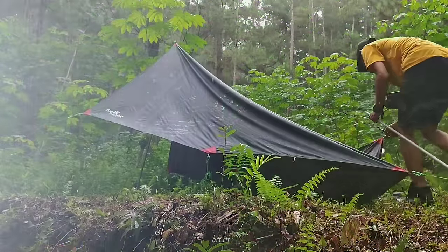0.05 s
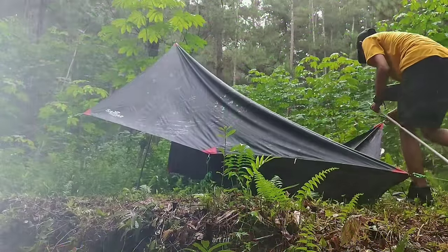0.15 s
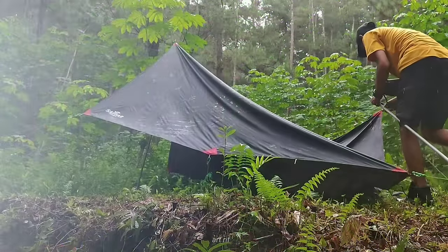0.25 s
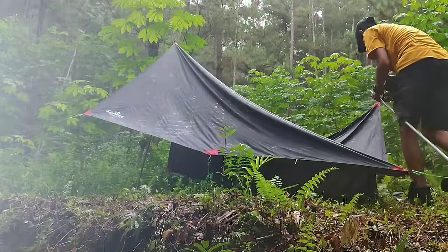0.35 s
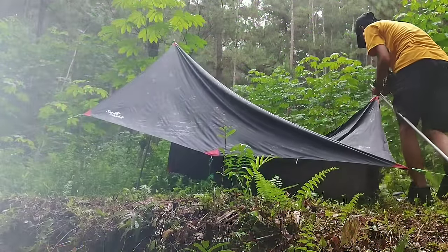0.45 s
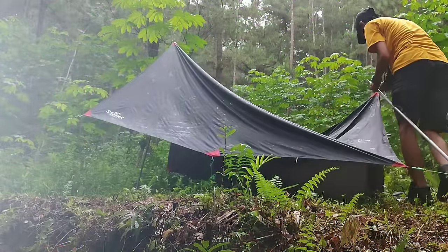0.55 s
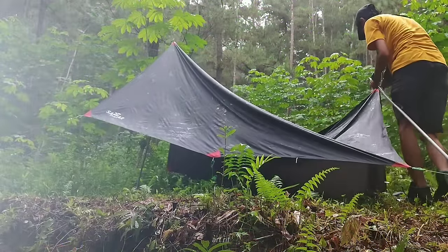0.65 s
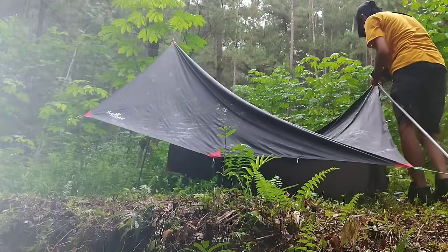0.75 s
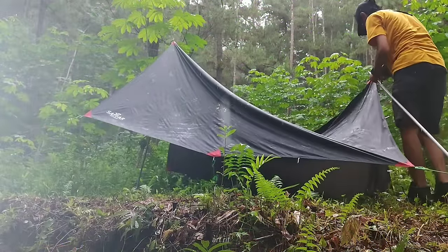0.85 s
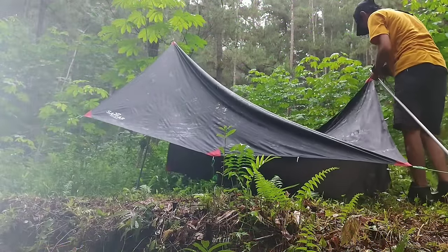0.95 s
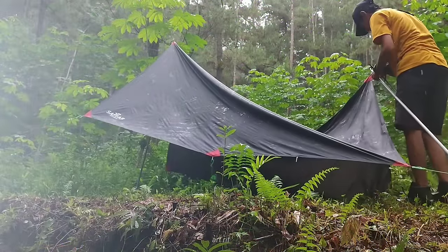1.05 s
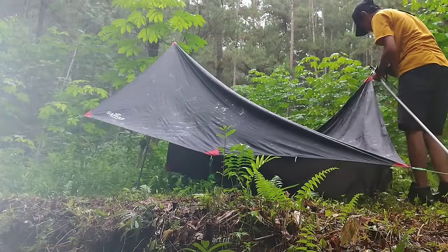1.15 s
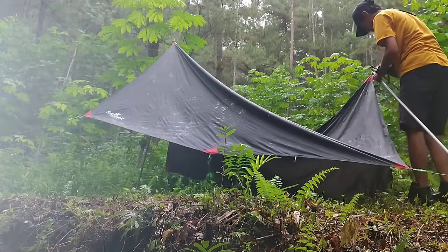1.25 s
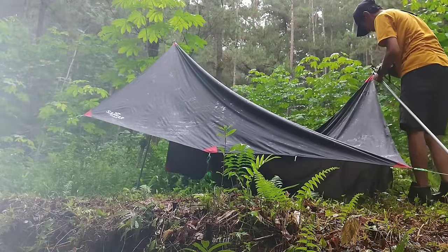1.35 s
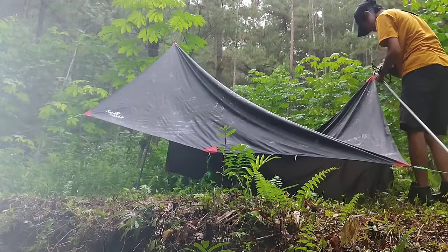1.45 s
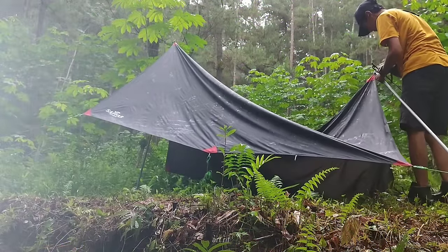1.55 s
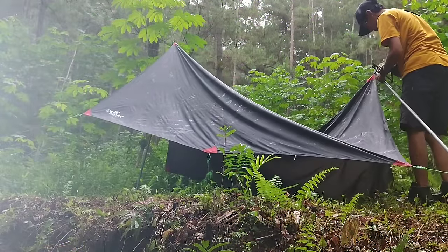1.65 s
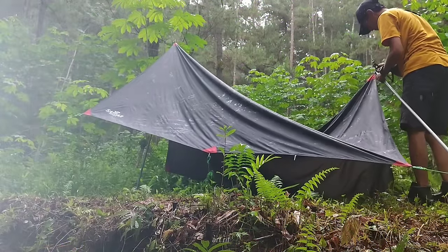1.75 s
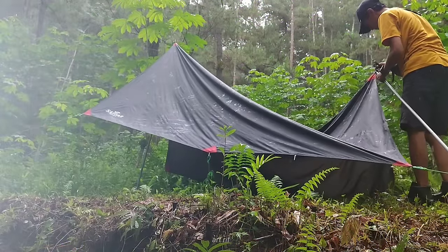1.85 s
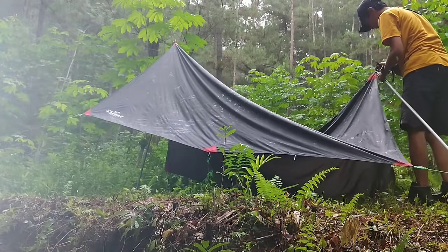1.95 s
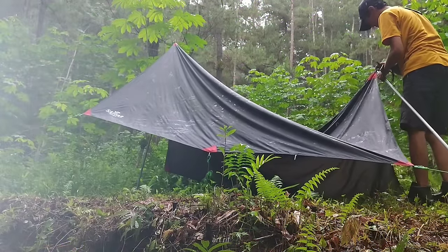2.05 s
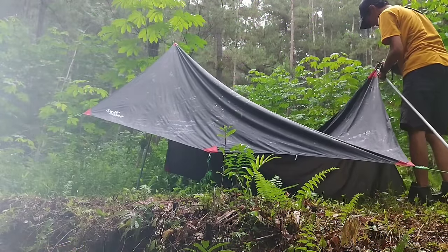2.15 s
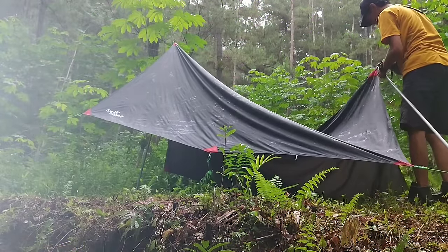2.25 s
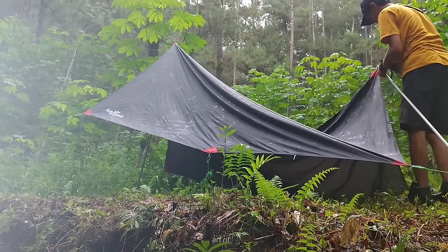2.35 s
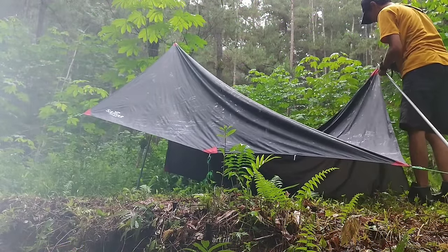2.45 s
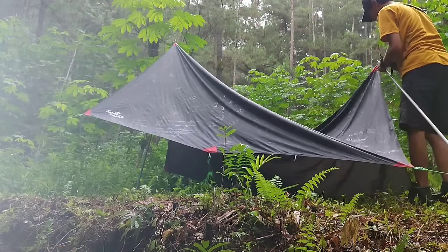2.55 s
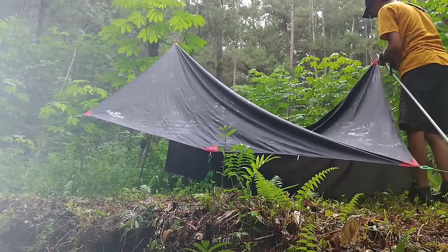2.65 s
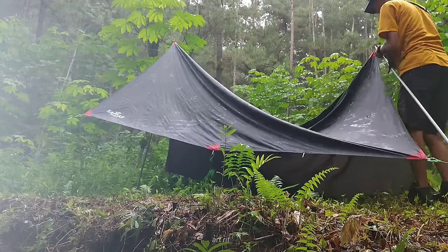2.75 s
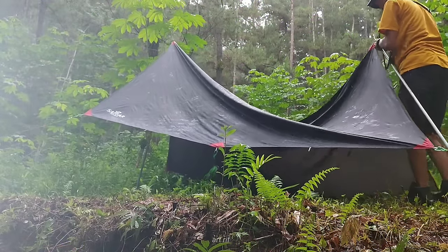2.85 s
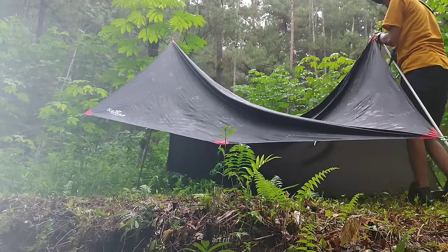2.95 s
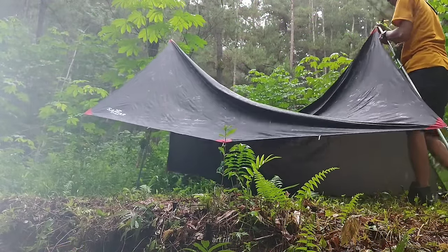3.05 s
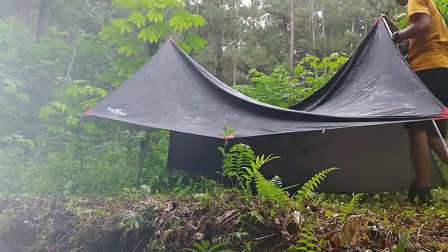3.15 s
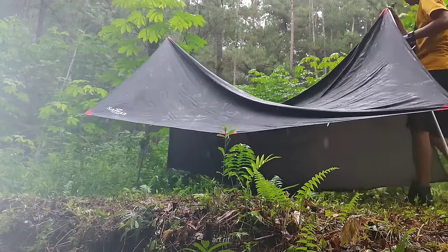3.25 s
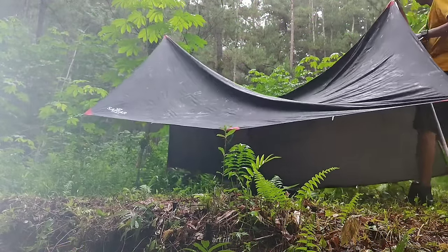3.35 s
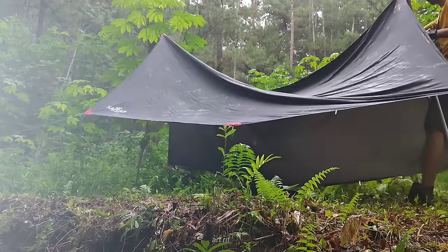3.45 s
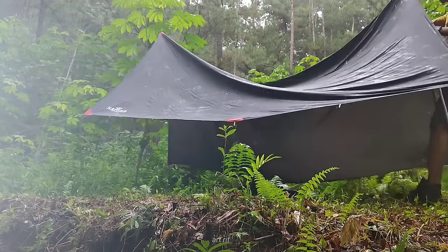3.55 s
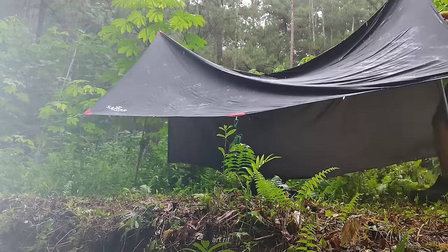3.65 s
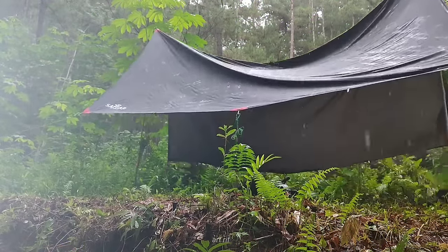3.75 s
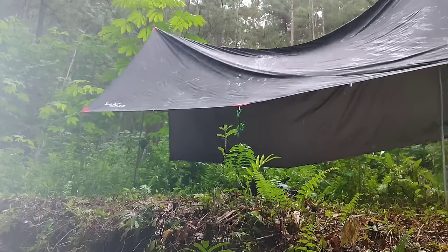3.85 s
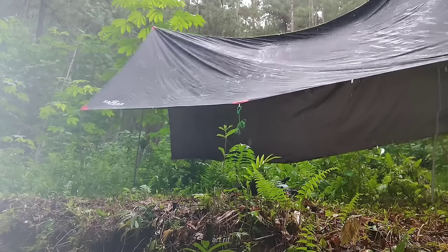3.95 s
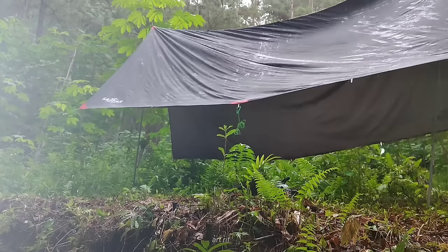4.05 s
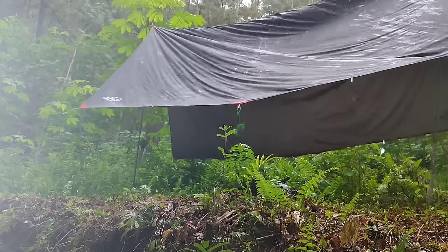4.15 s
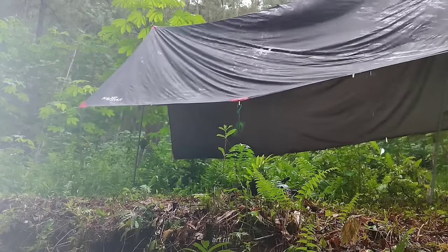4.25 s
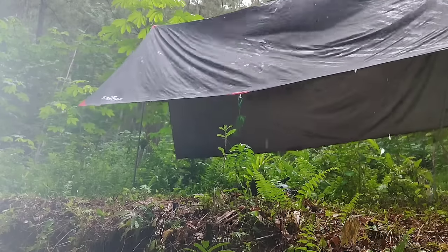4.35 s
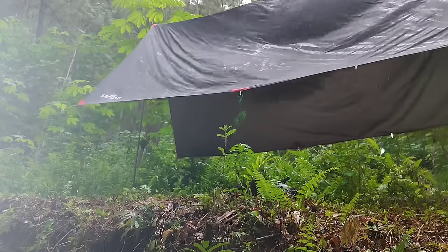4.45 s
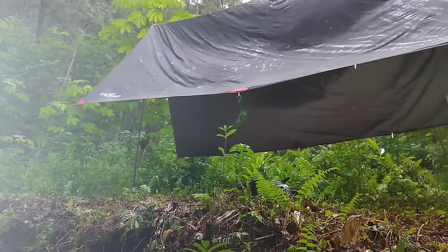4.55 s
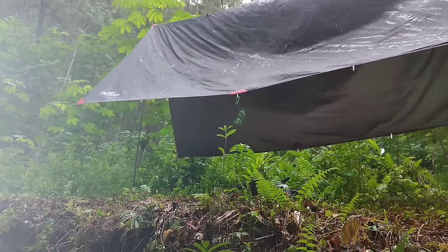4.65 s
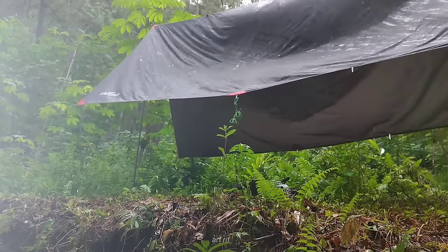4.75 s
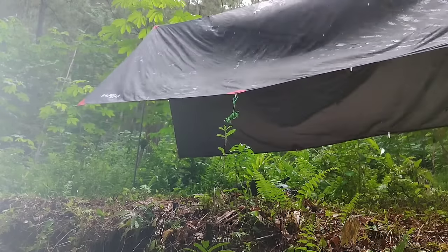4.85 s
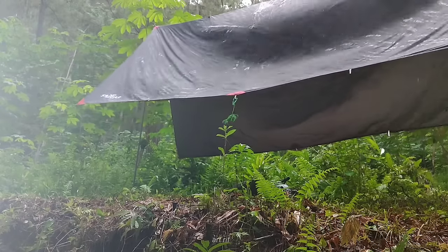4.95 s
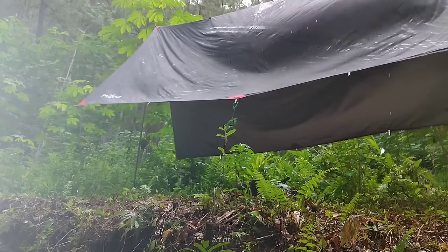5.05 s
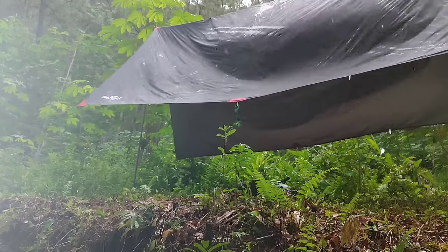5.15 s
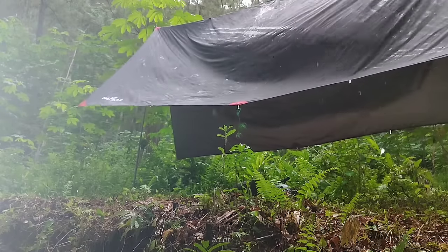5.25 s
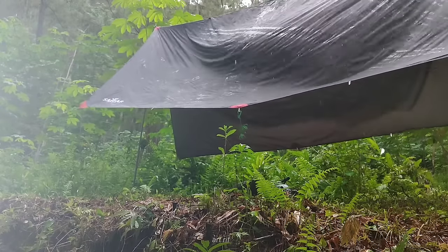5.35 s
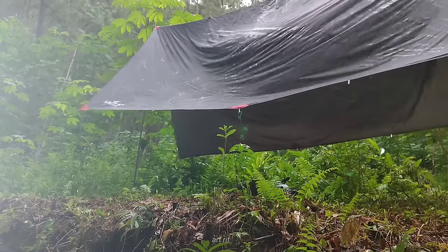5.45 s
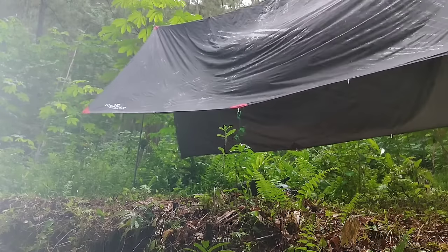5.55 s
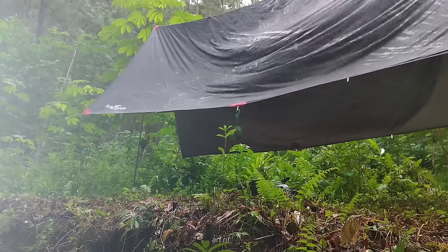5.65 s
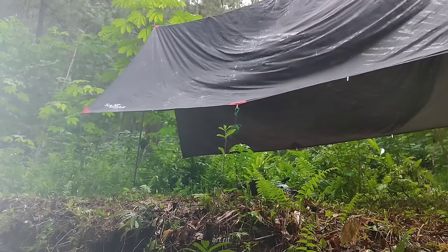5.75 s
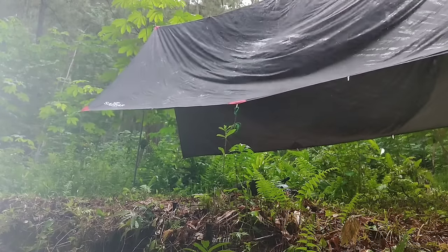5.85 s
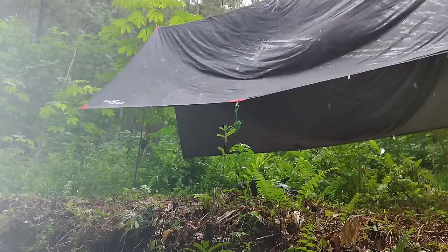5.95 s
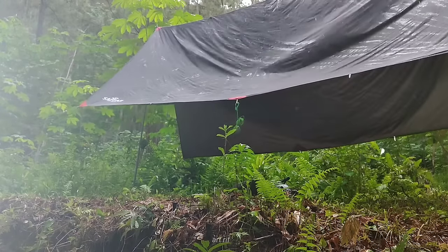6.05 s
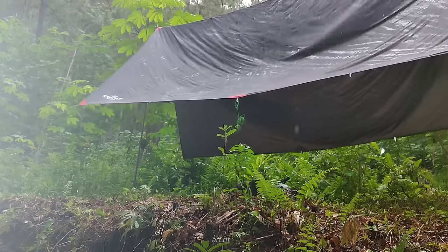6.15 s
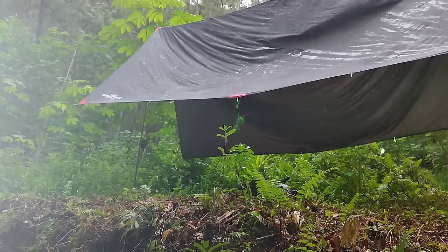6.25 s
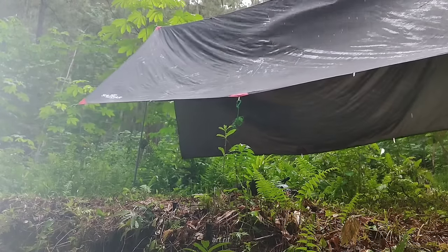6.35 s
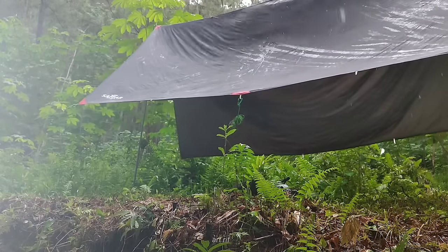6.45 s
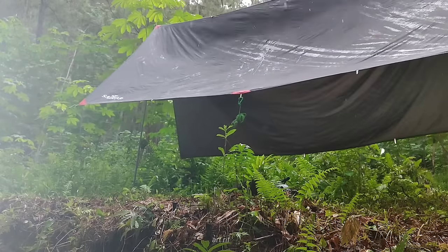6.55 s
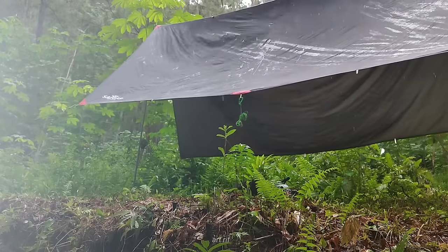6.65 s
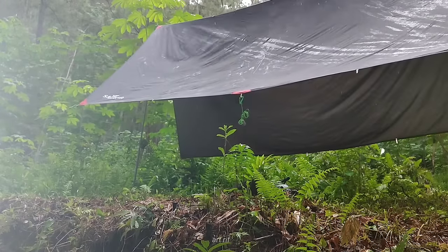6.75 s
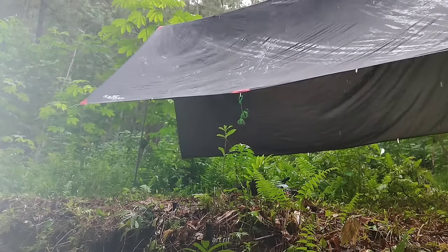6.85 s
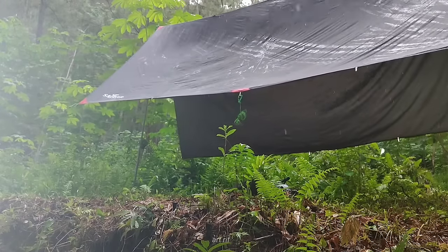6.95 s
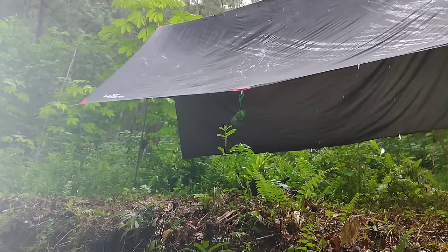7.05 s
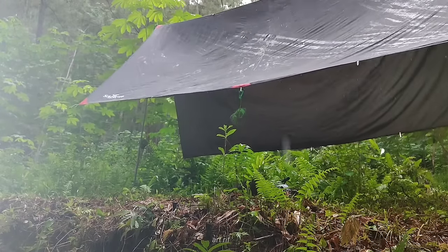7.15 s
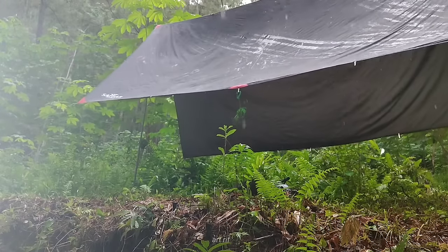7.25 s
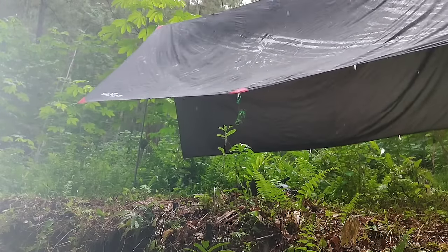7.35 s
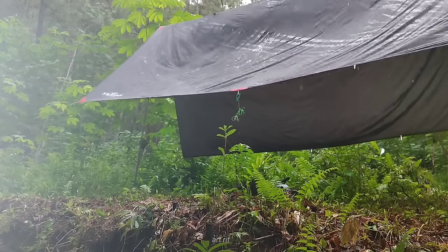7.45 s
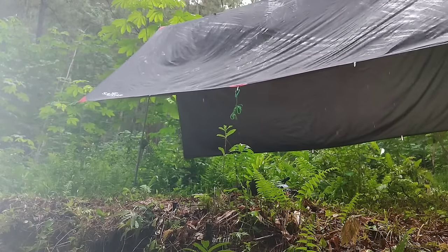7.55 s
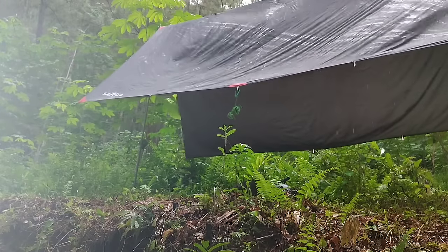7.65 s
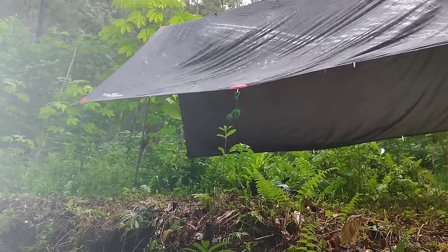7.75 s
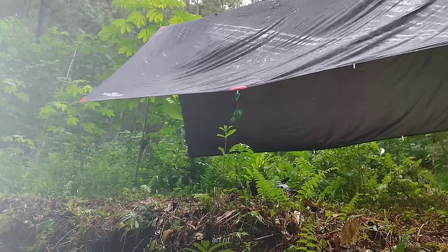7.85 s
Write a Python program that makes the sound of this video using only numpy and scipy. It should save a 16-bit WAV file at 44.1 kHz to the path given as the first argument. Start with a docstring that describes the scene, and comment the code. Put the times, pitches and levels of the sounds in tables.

```python
"""In a wet forest in heavy rain, two microphones, a few steps from a tarp being hoisted on a pole.
Far off, shaped low noise rolls as thunder; all round, steady noise hisses as foliage.
Around the tarp drops tick on leaves and patter as short pulses; drips plink in puddles as ringing bubbles.
The lifted tarp heaves and flutters as swelling noise, and its folds snap taut as damped low tones.
Up front, fat drops burst into noisy spray; most pop and ripple the fabric, a few only splat on leaves."""
import sys
import numpy as np
from scipy import signal
from scipy.fft import rfft, irfft, next_fast_len
from scipy.io import wavfile

SR = 44100
rng = np.random.default_rng(int(sys.argv[2]) if len(sys.argv) > 2 else 0)


def master(y):
    """Save y as 16-bit WAV."""
    cut = np.clip(np.atleast_2d(y).T, -1, 1)
    pcm = np.round(cut * 32767)  # scale
    wavfile.write(sys.argv[1], SR, pcm.astype(np.int16))


N = 348390  # length in samples

# In every table and setting a positive pan is louder on the left, a positive lag earlier on the left.
# Spectra give relative noise density per Hz; the overall level is set elsewhere.

# Far thunder, spectrum [f/Hz, density/dB]
THUNDER_SPECTRUM = [(10, -15), (25, -12), (42, 3), (105, -5.5), (170, -15.5), (300, -20.5), (700, -45)]
# Far thunder, rolling loudness [t/s, level/dB]
THUNDER_ROLL = [(0, -33), (0.17, -47), (0.5, -36), (1.15, -42), (1.45, -39.5), (1.75, -34), (2.25, -36),
                (2.45, -40), (2.7, -35), (3.3, -37.5), (5, -40.5), (5.7, -41), (5.97, -43), (6.2, -47),
                (6.8, -38.5), (7.25, -43), (7.9, -48)]
# Rain hiss in the foliage all round, spectrum [f/Hz, density/dB]
FOLIAGE_SPECTRUM = [(150, -3.5), (330, 8.5), (700, 1.5), (1300, 2), (2000, -6.5), (3000, -3.5),
                    (4500, -9.5), (7400, -11.5), (8900, -16.5), (11300, -10.5), (15500, -12.5)]
# Likeness of diffuse sound at the two microphones [f/Hz, correlation]
MIC_LIKENESS = [(60, 0.94), (160, 0.98), (270, 0.87), (450, 0.92), (740, 0.32), (1220, -0.32), (2000, 0.41),
                (3300, -0.056)]
# Drops shattering on the nearest leaves, spectrum [f/Hz, density/dB]
TICK_SPECTRUM = [(700, -26), (1800, -1), (3200, 1), (4500, -2), (7400, -4), (8900, -6.5), (11300, -5),
                 (15500, -2)]
# Single near drips in puddles, loud and faint [t/s, level/dB, bubble f/Hz, pan/dB]
SINGLE_DRIPS = [(0.492, -40, 4180, 1.0), (0.589, -44, 3000.0, 1.0), (0.645, -46, 4970, -0.5),
                (0.747, -50, 4220.0, 1.0), (0.756, -43, 5340.0, 2.0), (0.876, -44, 5943.0, 9.0),
                (1.038, -47, 5300.0, 2.0), (1.21, -48, 4134.0, 3), (1.329, -37, 2730, -2.0),
                (1.571, -43, 2170, 0), (1.74, -37, 2670, 0), (1.854, -36, 2900, 4),
                (1.899, -37, 3703.0, -0.5), (2.13, -37, 2290, 0.5), (2.204, -39, 1550, 3),
                (2.209, -44, 7500.0, 5.5), (2.288, -37.5, 2730, 0.0), (2.297, -42, 5340.0, 1.0),
                (2.32, -47, 1640, 0), (2.335, -39, 3760, 5), (2.426, -38, 2960, 1), (2.474, -39, 1900, 4),
                (2.694, -50, 3789.0, -6.0), (2.799, -41, 3250, 6), (2.868, -43, 3531.0, 4.5),
                (2.889, -38.5, 2280, 1.0), (2.923, -39, 3060, 4), (3.031, -38.5, 2980, -0.5),
                (3.355, -41, 2000, 2), (3.835, -41, 2410, 0), (3.891, -39, 2780, 0),
                (3.965, -35.5, 2150.0, 3.5), (4.016, -34, 3320, 3), (4.086, -37.5, 3050.0, 3.0),
                (4.123, -37, 2860, 2.5), (4.183, -40.5, 1750.0, 5.0), (4.254, -38, 3340.0, 2),
                (4.291, -39.5, 4930, 2.0), (4.359, -44, 3010, 0), (4.624, -39, 2370, 3.0),
                (4.724, -39.5, 5100, 0.0), (4.727, -38, 2600, 6.0), (5.033, -44, 3500.0, 3.0),
                (5.05, -39, 2420, -1.5), (5.129, -39, 2900.0, 2.0), (5.156, -38, 2740, 0),
                (5.176, -44, 5460, -2.0), (5.194, -40, 2325, 0), (5.402, -42, 1980, 0),
                (5.653, -42, 3273.0, 2.5), (5.72, -39.5, 2150, 0), (5.775, -42, 1980, 2),
                (5.918, -33, 580, -1), (5.94, -42, 3273.0, 5.5), (5.945, -40, 820, 2), (5.965, -42, 790, 0),
                (5.978, -42, 2550, 1), (6.072, -37, 810, 0), (6.088, -42, 790, 2),
                (6.668, -38, 2239.0, 1.5), (6.956, -44, 3000, 0), (7.209, -43, 4100, 4),
                (7.249, -41, 3850, 7), (7.445, -39, 2200, 5.0), (7.547, -45, 4134, 0.5),
                (7.684, -37, 2670, 0)]
# Tarp filling with air [crest t/s, length/s, heave of the sheet level/dB, flutter of its folds level/dB]
TARP_BILLOWS = [(0.47, 0.14, -31.5, -42), (0.976, 0.6, -38, -43.5), (2.246, 0.04, -31, -52),
                (2.895, 0.35, -35.5, -63), (3.618, 0.53, -44, -39), (3.822, 0.085, -25.5, -33.5),
                (3.902, 0.065, -28, -30.5), (4.003, 0.1, -21.5, -32), (4.142, 0.16, -26, -30.5),
                (4.38, 0.22, -28, -30), (4.688, 0.22, -32, -34), (4.764, 0.055, -32, -36),
                (4.862, 0.08, -36, -33), (4.927, 0.062, -21.5, -33), (4.998, 0.093, -24.5, -37),
                (5.12, 0.11, -28, -33.5), (5.318, 0.29, -27.5, -35), (5.47, 0.11, -29, -32.5),
                (5.624, 0.31, -30.5, -35.5), (6.45, 0.13, -31, -35), (6.61, 0.12, -51, -35.5),
                (6.96, 0.1, -38.5, -50), (7.76, 0.38, -31, -34)]
# Heaving sheet, spectrum [f/Hz, density/dB]
HEAVE_SPECTRUM = [(10, -12), (25, 6), (42, 6.5), (100, 9), (130, 4.5), (190, -21), (400, -55)]
# Fluttering folds, spectrum [f/Hz, density/dB]
FLUTTER_SPECTRUM = [(80, -17), (135, -0.5), (190, -2.5), (270, -7), (380, -16.5), (800, -52)]
# Sheet snapping taut [t/s, peak level/dB, f/Hz]
TARP_SNAPS = [(3.586, -19.5, 264), (3.816, -14.5, 83.4), (3.895, -19.5, 103), (3.902, -26, 234),
              (3.974, -12, 75.5), (4.008, -12.5, 82), (4.095, -14.5, 81), (4.137, -15, 93),
              (4.206, -22.5, 186), (4.34, -16, 123), (4.381, -20, 201), (4.412, -21, 208),
              (4.681, -17.5, 90), (4.909, -14.5, 96), (4.979, -15, 109), (5.133, -16, 75.4),
              (5.332, -18.5, 102), (5.426, -26, 238), (5.472, -20, 175), (7.843, -21, 199)]
# Fat drops on the tarp, and bright splats on near leaves with hardly any pop
# [t/s, pop level/dB, contact/ms, pan/dB, spray level/dB, falling droplets level/dB]
FAT_DROPS = [(0.0663, -26, 0.8, 0, -38, -46), (0.1152, -16, 0.53, -1, -34, -46.5),
             (0.125, -13, 0.8, 14, -20, -51), (0.154, -8.5, 0.57, 1, -20, -30),
             (0.1624, -31, 0.72, -0.5, -31, -38.5), (0.1708, -11, 0.7, -2, -16, -47),
             (0.2449, -19.0, 0.52, -0.5, -29, -47), (0.282, -28, 1.1, 0.5, -35, -40),
             (0.293, -42, 0.4, -1.5, -26, -37), (0.3121, -20.5, 0.7, -0.5, -31, -49),
             (0.3564, -20, 0.56, -7.5, -31, -48), (0.4124, -23, 0.55, -1, -32, -36),
             (0.4191, -17, 0.87, -3, -21, -42), (0.4496, -28, 0.62, -0.5, -32, -46),
             (0.4799, -19.5, 1.4, -2.5, -21.5, -36.0), (0.5013, -27, 0.66, 1, -31, -42),
             (0.5907, -27, 0.53, -0.5, -39, -42), (0.6636, -28, 0.9, 0.5, -38, -44),
             (0.6822, -25, 0.4, -0.5, -34, -42), (0.6886, -17.5, 0.64, 7, -23.5, -32),
             (0.702, -22, 0.49, -9, -30, -50), (0.796, -30, 0.6, 0.5, -29, -39),
             (0.8523, -5.5, 1.18, 0, -19, -30), (0.8608, -13.5, 0.68, -0.5, -19, -27),
             (0.8777, -12.5, 0.96, 0.5, -25, -33), (0.954, -18.5, 0.85, 1.5, -26, -31),
             (0.9833, -11.5, 0.69, 1.5, -21, -28), (0.992, -17.5, 0.98, -1, -25, -31),
             (1.166, -25, 1.2, 4, -38, -36), (1.1756, -28, 0.5, 0, -39, -40),
             (1.2451, -26, 0.41, 10, -39, -43), (1.2561, -21, 0.3, -1, -38, -32),
             (1.3501, -20.5, 0.69, -0.5, -34, -34), (1.3672, -27, 0.65, 0, -36, -43),
             (1.3881, -20.5, 0.81, -0.5, -29, -34), (1.4011, -22.5, 0.55, -0.5, -34, -35),
             (1.4492, -16.5, 0.49, 1.5, -31, -33), (1.5675, -51, 0.59, 0.5, -30.5, -49),
             (1.588, -43, 0.64, 0, -32, -39), (1.597, -23, 0.43, -0.5, -22.5, -40),
             (1.649, -44, 0.64, -3, -30, -48), (1.709, -23, 0.66, 0, -32, -32.5),
             (1.81, -14, 0.91, -2.5, -22, -28.5), (1.8262, -27, 0.87, 0.5, -37, -43),
             (1.8504, -20, 0.4, 1, -24, -31.5), (1.866, -24, 0.59, 0, -33, -46),
             (2.1413, -13.5, 0.62, -0.5, -22.5, -32), (2.1846, -12.5, 0.87, 0, -31, -34.5),
             (2.19, -22, 0.52, -2.5, -37, -37), (2.3032, -27, 0.43, 0, -31, -39),
             (2.3888, -24, 0.22, 2, -39, -45), (2.4054, -30, 0.7, -1.5, -31, -39),
             (2.4147, -31, 0.78, -0.5, -33, -39), (2.434, -29, 0.9, 2, -37, -44),
             (2.5023, -26, 0.75, 0.5, -36, -37), (2.5464, -27, 0.43, 2, -37, -43),
             (2.5978, -17.5, 0.38, -0.5, -29, -42), (2.6223, -25, 1.1, 1.5, -34, -46),
             (2.694, -18.5, 0.73, -2, -28, -30), (2.8028, -45, 0.64, -2.5, -31, -38),
             (2.834, -40, 0.28, 1, -30, -42), (2.9228, -41, 0.55, 0.5, -29, -40),
             (2.9489, -22.5, 0.6, -0.5, -30.0, -45), (2.968, -28, 0.7, 1.5, -36, -48),
             (3.1749, -18, 0.39, -4, -29, -35), (3.1857, -11.5, 1.05, 0, -22, -32),
             (3.2258, -28, 0.8, 1, -37, -37), (3.272, -27, 0.66, 1.5, -31, -38),
             (3.38, -15, 1.03, -10.5, -20, -51), (3.3885, -16.5, 0.89, -1, -34, -38),
             (3.435, -30, 0.88, 1, -35, -37), (3.4884, -25, 0.28, 0.5, -33, -44),
             (3.5077, -15, 0.37, 0, -23, -40), (3.5837, -25, 0.75, 0.5, -30, -38),
             (3.5887, -22, 1, -1, -34, -37), (3.6127, -19.5, 0.53, -0.5, -34, -43),
             (3.6384, -29, 0.76, -1.5, -41, -44), (3.6571, -18, 0.53, -2, -21.5, -39),
             (3.6637, -25, 1.1, -6, -41, -52), (3.7139, -25, 0.46, 1, -27, -35),
             (3.763, -25.5, 0.5, 0.5, -41, -52), (4.0159, -17.5, 1.05, 1, -28, -32),
             (4.0311, -26, 1.2, 0.5, -23, -45), (4.0458, -19.5, 0.55, 0.5, -36, -51),
             (4.3531, -15.5, 0.58, 1.5, -38, -47), (4.3604, -25, 1.2, -0.5, -39, -49),
             (4.535, -20.5, 0.88, -1, -33, -35), (4.5891, -11, 0.98, 0.5, -36, -29),
             (4.6641, -9.5, 1.07, 0.5, -25, -35), (4.6802, -27, 0.64, 1.5, -34, -52),
             (4.74, -19.5, 0.48, -1.5, -24.5, -36), (4.7913, -24, 0.93, 1, -40, -40),
             (4.806, -25, 0.55, 0, -38, -48), (4.898, -24, 0.76, 2, -27, -45),
             (4.9799, -13, 0.79, 0.5, -27, -33), (5.0001, -18.5, 0.64, 0.5, -39, -35),
             (5.125, -29, 0.94, 0.5, -37, -48), (5.2745, -24, 0.61, -2, -24.5, -35.5),
             (5.5219, -17.0, 1.2, 2, -29, -40), (5.5532, -39, 0.78, -0.5, -32, -36),
             (5.5804, -26, 1, 0, -43, -47), (5.6177, -20.5, 1.1, -5, -23.5, -33),
             (5.6584, -39, 0.46, -0.5, -27, -45), (5.7841, -32, 0.5, 0.5, -29, -45),
             (5.8882, -22, 0.59, 2, -36, -42), (5.9036, -10, 0.88, 0.5, -30, -30),
             (5.9233, -27, 0.37, 0, -32, -36), (5.968, -32, 0.79, 0.5, -26, -40),
             (6.0664, -23, 0.54, -5, -25, -43), (6.1028, -20, 0.75, -6, -25, -31),
             (6.1357, -22, 0.77, -1.5, -23, -33), (6.2064, -52, 0.41, 1.5, -27, -39),
             (6.2314, -51, 0.6, -2.5, -29, -45), (6.3163, -12.5, 0.33, 0.5, -26, -46),
             (6.3697, -24.5, 0.43, 0.5, -36, -36), (6.4061, -29, 0.32, 0.5, -36, -35),
             (6.5377, -22.5, 0.54, -0.5, -38, -40), (6.5796, -21, 0.67, -1.5, -25, -34),
             (6.5864, -25, 0.48, -1.5, -30, -33.5), (6.7673, -25, 0.6, 0.5, -30, -38),
             (6.8088, -21, 0.17, 1, -22.5, -43), (6.839, -42, 0.7, -2, -40, -46),
             (6.9656, -31, 0.78, -3, -28, -32), (6.995, -11.5, 0.66, -1, -30, -34),
             (7.0606, -14.5, 0.74, -1.5, -29.0, -34), (7.0936, -21, 0.82, 1, -30, -37),
             (7.1056, -26, 0.36, 1.5, -41, -38), (7.125, -23, 0.95, 1.5, -37, -43),
             (7.314, -30, 0.65, 1, -38, -42), (7.4021, -9, 1.15, 0.5, -26, -40),
             (7.408, -18.5, 0.94, 0.5, -40, -47), (7.4145, -28, 1.3, 0, -40, -45),
             (7.424, -30, 0.73, -7, -26, -35), (7.4306, -18.5, 0.98, 1, -36, -34),
             (7.58, -18, 0.42, 0.5, -33, -36), (7.7508, -32, 0.45, 0.5, -40, -48),
             (7.7898, -46, 0.3, 0, -32, -39), (7.8143, -24, 0.54, 0, -25, -44),
             (7.8377, -23.5, 0.9, -5, -28, -37)]
# Spray of the fat drops, spectrum [f/Hz, density/dB]
SPRAY_SPECTRUM = [(400, 19.5), (1500, 16.5), (3200, 15), (4500, 4.5), (7400, 3.5), (8900, -1.5),
                  (11300, 5.5), (15500, 3.5)]

# The shower is steady: foliage hiss and patter on the tarp
HISS_DB, PATTER_DB = -45, -45.5
# A drop off to one side reaches that microphone first
LAG_MS_PER_DB, WIDEST_LAG_MS = 0.27, 0.49
# Much of the rain lands in wet growth to the left: share of the small drops, lead of that microphone
LEFT_SHARE, LEFT_LEAD_MS = 0.33, 0.37
# The tarp is lifted on the right, so it reaches that microphone first
TARP_LEAD_MS = 0.35
# Between billows the slack sheet keeps stirring
SLACK_HEAVE_DB, SLACK_FLUTTER_DB = -38.5, -42
# Random, mostly softer drips: rate, middle level, range of bubble pitch
SOFT_DRIPS_PER_S, SOFT_DRIP_DB, DRIP_LOW_HZ, DRIP_HIGH_HZ = 6.0, -49.5, 1530, 5000
# The ground answers a fat drop: average delay, level relative to the pop
GROUND_ECHO_S, GROUND_ECHO_DB = 0.00519, -12.5
POP_LEAD_S = 0.001  # room for the rise of a pop before its peak
CUTOFF_HZ = 15700  # top of the microphones' range


def from_db(db):
    """Decibels to amplitude gain."""
    return 10 ** (np.asarray(db) / 20)


def rms_one(x):
    """Scale to rms 1."""
    return x / np.sqrt(np.mean(x ** 2) + 1e-20)


def in_time(rows):
    """The columns of a curve, interpolated to one value per sample."""
    s, *columns = np.transpose(rows)
    return [np.interp(np.arange(N) / SR, s, column) for column in columns]


def per_bin(points):
    """A (Hz, value) table read at every frequency bin, along log frequency."""
    hz, value = np.transpose(points)
    size = next_fast_len(N)
    bin_hz = np.arange(size // 2 + 1) * SR / size
    return np.interp(np.log(bin_hz + 1), np.log(hz), value)


def filtered(x, gain):
    """Apply one gain per frequency bin."""
    size = next_fast_len(N)
    return irfft(rfft(x, size) * gain, size)[..., :N]


def coloured(x, spectrum):
    """Give a flat sound a spectrum, keeping its power."""
    return filtered(x, rms_one(from_db(per_bin(spectrum))))


def diffuse(spectrum):
    """Noise from all round: mid and side weights set how alike the microphones hear each band; rms 1."""
    alike = np.clip(per_bin(MIC_LIKENESS), -.99, .99)
    gain = from_db(per_bin(spectrum)) * np.sqrt([1 + alike, 1 - alike])
    mid, side = filtered(rng.standard_normal((2, N)), gain)
    return rms_one(np.array([mid + side, mid - side]))


def add(out, s, sound, pan_db, lag_ms):
    """Place a sound between the microphones by level and arrival time."""
    stereo = np.broadcast_to(sound, (2, sound.shape[-1]))
    for channel, side, wave in zip(out, (1, -1), stereo):
        start = int(np.clip(round((s - side * lag_ms / 2000) * SR), 0, N))
        piece = wave[:N - start]
        channel[start:start + len(piece)] += piece * from_db(side * pan_db / 2)


def right_first(sound):
    """A sound from the tarp's side reaches the right microphone first."""
    out = np.zeros((2, N))
    add(out, TARP_LEAD_MS / 1000, sound, 0, -TARP_LEAD_MS)
    return out


def clumps(per_s, depth_db):
    """A gain that wanders quickly, as when water leaves the canopy in clumps or folds stir in fits."""
    steps = np.clip(rng.standard_normal(1000), -1.7, 1.7)
    wander = np.interp(np.arange(N) / SR * per_s, np.arange(len(steps)), steps)
    return from_db(depth_db * wander)


def shower_of(per_s, spread_db, width_db):
    """Random drops, a few near and many far: rows (s, gain, size 0-1, pan dB, lag ms)."""
    when, near, size, side, shade, place = rng.random((int(per_s * N / SR), 6)).T
    gain = from_db(spread_db * np.minimum(-np.log(1 - near), 2.9))
    all_round_ms = WIDEST_LAG_MS * np.sin(np.pi * (side - .5))
    lag_ms = np.where(place < LEFT_SHARE, LEFT_LEAD_MS, all_round_ms)
    return zip(when * N / SR, gain, size, width_db * (2 * shade - 1), lag_ms)


def scattered(per_s, size):
    """Times strewn unevenly over the whole scene, each with further chances from -1 to 1."""
    slot, *chances = rng.random((int(per_s * N / SR), size + 1)).T
    return (np.arange(len(slot)) + slot) / per_s, *(2 * np.array(chances) - 1)


def bubble(hz, cycles, rise=0.013):
    """A trapped bubble swells in, decays over a few cycles and rises in pitch as it nears the surface."""
    turns = np.arange(SR // 25) / SR * hz
    age = turns / cycles
    ring = np.sin(2 * np.pi * turns * (1 + rise * np.minimum(age, 5) / 2))
    return ring * (1 - np.exp(-turns / 2)) * np.exp(-age)


def pop(contact_ms, sharpness=0.16, trough=0.69, trough_at=0.94, trough_width=0.6, rebound=0.32,
        taut_ms=0.53):
    """A drop slaps fabric and dents it: a pointed peak, a longer trough; short contact springs back more."""
    u = (np.arange(SR // 150) / SR - POP_LEAD_S) / (max(contact_ms, .1) / 1000)  # time in contacts
    peak = 1 / np.cosh(np.clip(u / sharpness, -20, 20))
    dent = np.exp(-((u - trough_at) / trough_width) ** 2)
    spring = np.exp(-((u - 2 * trough_at) / trough_width) ** 2)
    tautness = np.exp(-(contact_ms / taut_ms) ** 2)
    return peak - trough * dent + rebound * tautness * spring


def thunder():
    """Far thunder rolls slowly: low noise under a loudness curve, first at the right microphone."""
    level_db, = in_time(THUNDER_ROLL)
    return right_first(from_db(level_db) * diffuse(THUNDER_SPECTRUM))


def foliage_hiss():
    """Countless drops on the foliage all round merge into a slightly wavering noise."""
    return from_db(HISS_DB) * clumps(per_s=24, depth_db=0.7) * diffuse(FOLIAGE_SPECTRUM)


def forest(x, tail_db=-17, t60=0.11, dull_hz=3000):
    """The trees scatter a faint, short tail of decaying noise, dulled after its level is set."""
    t = np.arange(SR // 2) / SR
    echoes = rng.standard_normal((2, len(t))) * from_db(-60 * t / t60)
    echoes *= from_db(tail_db) / np.linalg.norm(echoes[0])
    echoes = signal.sosfilt(signal.butter(1, dull_hz, fs=SR, output="sos"), echoes)
    return x + signal.fftconvolve(x, echoes, axes=-1)[:, :N]


def plinks(per_s=300, spread_db=2.5, centre_hz=2750, octaves=0.22, level_db=-52.0):
    """Drips plink in puddles further off: bubbles mostly near one size, some ringing longer."""
    out = np.zeros((2, N))
    for s, gain, size, pan_db, lag_ms in shower_of(per_s, spread_db, width_db=8.0):
        hz = np.clip(centre_hz * (size / (1 - size) + 1e-6) ** octaves, 1100, 8000)
        cycles = rng.uniform(2.5, 12)
        add(out, s, gain * min(1, centre_hz / hz) * bubble(hz, cycles), pan_db, lag_ms)
    return from_db(level_db) * rms_one(out)


def leaf_taps(per_s=80, spread_db=4.0, low_hz=1500, high_hz=7000, treble_db_per_octave=-3.0,
              level_db=-55.0):
    """Single drops tap leaves and twigs: dry, quickly damped ticks, each with its own pitch."""
    out = np.zeros((2, N))
    for s, gain, size, pan_db, lag_ms in shower_of(per_s, spread_db, width_db=5.0):
        hz = low_hz * (high_hz / low_hz) ** size
        slope = from_db(treble_db_per_octave * np.log2(hz / low_hz))
        add(out, s, gain * slope * bubble(hz, cycles=2.7), pan_db, lag_ms)
    return from_db(level_db) * rms_one(out)


def ticks(per_s=320, spread_db=2.5, decay_s=0.00064, level_db=-50):
    """Drops shatter on the nearest leaves in tiny bright noise bursts, longer for larger drops."""
    out = np.zeros((2, N))
    t = np.arange(SR // 100) / SR
    for s, gain, size, pan_db, lag_ms in shower_of(per_s, spread_db, width_db=10):
        age = t / (decay_s * (1.5 + size))
        burst = rng.standard_normal((2, len(t))) * np.sqrt(age) * np.exp(-age)
        add(out, s, gain * burst, pan_db, lag_ms)
    return from_db(level_db) * rms_one(coloured(out, TICK_SPECTRUM))


def patter(per_s=380, spread_db=4.5, shortest_ms=0.24, longest_ms=1.0):
    """Small drops pop on the tarp and on broad leaves, with longer contact for larger drops."""
    out = np.zeros((2, N))
    for s, gain, size, pan_db, lag_ms in shower_of(per_s, spread_db, width_db=5.0):
        contact_ms = shortest_ms * (longest_ms / shortest_ms) ** size
        add(out, s, gain * pop(contact_ms), pan_db, lag_ms)
    return from_db(PATTER_DB) * rms_one(out)


def plip(hz, cycles, wet_db=-15, wet_s=0.0031):
    """A drip's short, uneven splash rings its bubble, differing a little per side; rms 1 over 5 ms."""
    t = np.arange(SR // 125) / SR
    splash = from_db(wet_db) * rng.standard_normal((2, len(t))) * np.exp(-t / wet_s)
    splash[:, 0] += 1
    ring = signal.fftconvolve(splash, bubble(hz, cycles, rise=0.0017)[None], axes=-1)
    return ring / np.linalg.norm(ring, axis=1, keepdims=True) * np.sqrt(SR / 200)


def near_drips(width_db=5, range_db=3):
    """The nearest drips ring their bubbles one by one, listed ones and mostly softer random ones."""
    out = np.zeros((2, N))
    when, strength, size, side = scattered(SOFT_DRIPS_PER_S, size=3)
    pitch = DRIP_LOW_HZ * (DRIP_HIGH_HZ / DRIP_LOW_HZ) ** ((1 + size) / 2)
    random_drips = zip(when, SOFT_DRIP_DB + range_db * strength, pitch, width_db * side)
    for s, drip_db, hz, pan_db in [*SINGLE_DRIPS, *random_drips]:
        add(out, s, from_db(drip_db) * plip(hz, cycles=4), pan_db, LEFT_LEAD_MS)
    return out


def billowing():
    """Each billow's power rises and sinks in a bell above the slack stirring: heave and flutter gains."""
    t = np.arange(N) / SR
    power = from_db([[SLACK_HEAVE_DB], [SLACK_FLUTTER_DB]]) ** 2
    for crest_s, length_s, heave_db, flutter_db in TARP_BILLOWS:
        bell = np.exp(-(2 * (t - crest_s) / length_s) ** 2)
        power = power + from_db([[heave_db], [flutter_db]]) ** 2 * bell
    return np.sqrt(power)


def tarp_billows():
    """The lifted sheet moves air in low heaves while its folds flutter higher, both in uneven fits."""
    heave, flutter = billowing()
    fits = clumps(per_s=14, depth_db=1.5)
    return right_first(fits * (heave * diffuse(HEAVE_SPECTRUM) + flutter * diffuse(FLUTTER_SPECTRUM)))


def flaps(decay_cycles=0.56):
    """Slack fabric pulled taut gives a soft, quickly damped thump; small folds sound higher and shorter."""
    out = np.zeros((2, N))
    t = np.arange(SR // 8) / SR
    for s, peak_db, hz in TARP_SNAPS:
        age = t * hz / decay_cycles
        thump = np.sin(2 * np.pi * hz * t) * age * np.exp(1 - age)
        add(out, s, from_db(peak_db) * thump, 0, -TARP_LEAD_MS)
    return out


def panel_ring(t, low_hz=260, high_hz=760, decay_s=0.012):
    """The struck panel of fabric booms briefly in five low modes, drawn afresh for every drop."""
    place, strength = rng.random((2, 5, 1))
    hz = low_hz * (high_hz / low_hz) ** place
    modes = (2 * strength - 1) * np.sin(2 * np.pi * hz * t)
    return modes.mean(axis=0) * np.exp(-t / decay_s)


def fat_drops(spray_s=0.00047, spray_lead_s=0.0007, spray_low_hz=900, scatter_db=-3.5, scatter_s=0.013,
              ripple_db=-24, ripple_s=0.0069, ripple_hz=(250, 1600), boom_db=-7.0, boom_delay_s=0.0019,
              echo_stretch=1.39):
    """Fat drops burst into spray; most pop and ripple the fabric, a few only splat brightly on leaves."""
    pops, spray, ripples = np.zeros((3, 2, N))
    t = np.arange(SR // 12) / SR
    fine = signal.butter(1, spray_low_hz, "high", fs=SR, output="sos")
    for s, peak_db, contact_ms, pan_db, burst_db, fall_db in FAT_DROPS:
        lag_ms = np.clip(LAG_MS_PER_DB * pan_db, -WIDEST_LAG_MS, WIDEST_LAG_MS)
        add(pops, s - POP_LEAD_S, from_db(peak_db) * pop(contact_ms), pan_db, lag_ms)
        # the soft ground answers a moment later and duller, the delay varying from drop to drop
        echo = from_db(peak_db + GROUND_ECHO_DB) * pop(contact_ms * echo_stretch)
        echo_delay_s = GROUND_ECHO_S * (1 + 0.096 * rng.standard_normal())
        add(pops, s - POP_LEAD_S + echo_delay_s, echo, 0, lag_ms)
        boom = from_db(peak_db + boom_db) * panel_ring(t)
        add(pops, s + boom_delay_s, boom, pan_db, lag_ms)

        burst, droplets, waves = rng.standard_normal((3, 2, len(t)))
        burst_shape = 2 * t / spray_s * np.exp(-t / spray_s)
        wet = from_db(burst_db) * signal.sosfilt(fine, burst) * burst_shape
        # cubed noise is sparse and spiky, like single droplets falling back
        wet += from_db(fall_db + scatter_db) * rms_one(droplets ** 3) * np.exp(-t / scatter_s)
        add(spray, s - spray_lead_s, wet, pan_db / 2, lag_ms)
        ripple = from_db(peak_db + ripple_db) * waves[0] * np.exp(-t / ripple_s)
        add(ripples, s, ripple, pan_db, lag_ms)
    sheet = signal.butter(1, ripple_hz, "band", fs=SR, output="sos")
    return pops + coloured(spray, SPRAY_SPECTRUM) + 2 * signal.sosfilt(sheet, ripples)


def scene():
    """Far thunder and foliage hiss behind, near drops among the trees, and the moving tarp."""
    background = thunder() + foliage_hiss()
    small_drops = clumps(per_s=45, depth_db=4.5) * (ticks() + patter())
    near = plinks() + leaf_taps() + small_drops + near_drips() + fat_drops()
    return background + forest(near) + tarp_billows() + flaps()


def record(dry):
    """The two microphones differ in the treble, the right mostly brighter; the top is cut."""
    # left minus right [f/Hz, level/dB]
    tilt_db = per_bin([(3000, 0.0), (5500, -1.7), (8200, 2.0), (9700, -3.0), (12000, -2.0), (15500, -3.0)])
    heard = filtered(dry, from_db([tilt_db / 2, -tilt_db / 2]))
    return signal.sosfilt(signal.ellip(12, .1, 80, CUTOFF_HZ, fs=SR, output="sos"), heard)


dry = scene()
out = record(dry)
master(out)
```